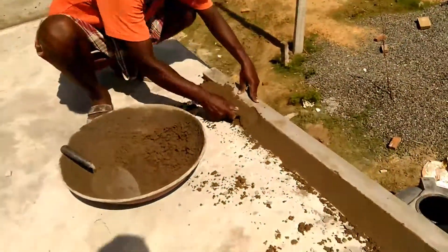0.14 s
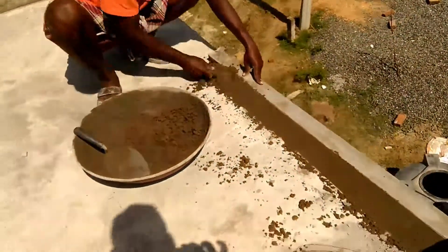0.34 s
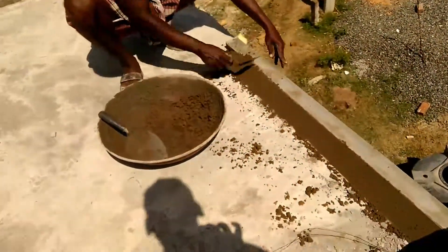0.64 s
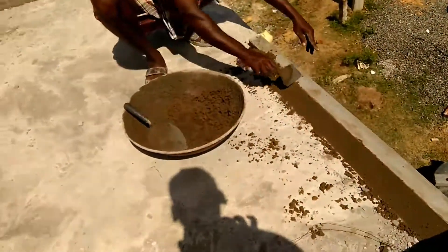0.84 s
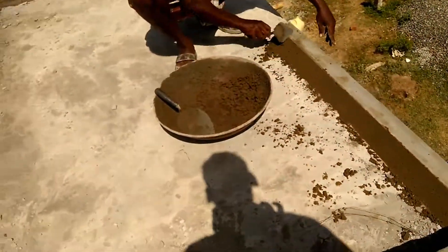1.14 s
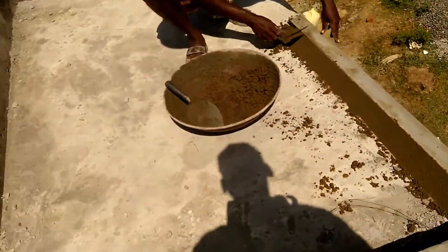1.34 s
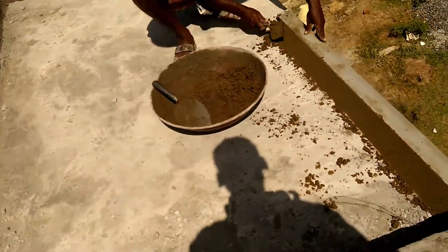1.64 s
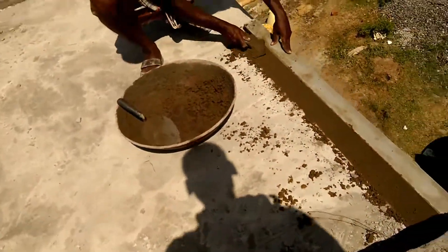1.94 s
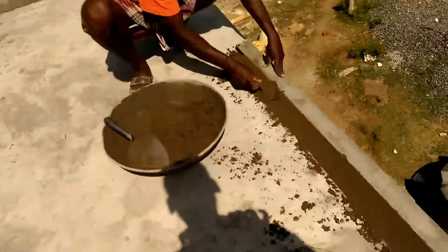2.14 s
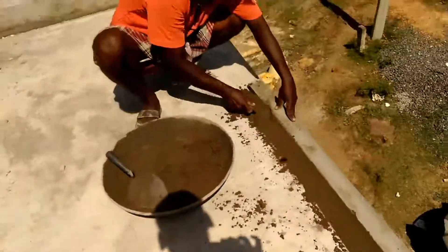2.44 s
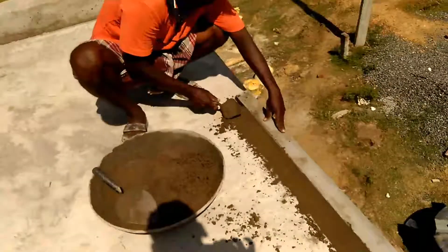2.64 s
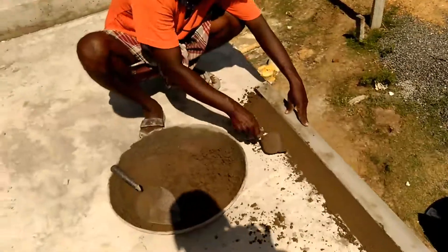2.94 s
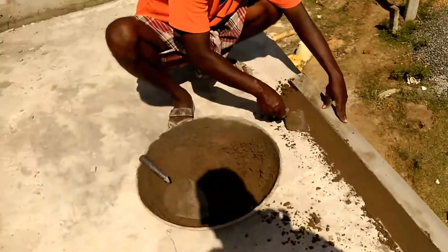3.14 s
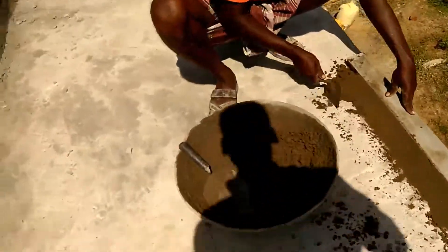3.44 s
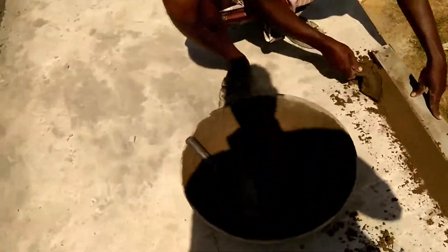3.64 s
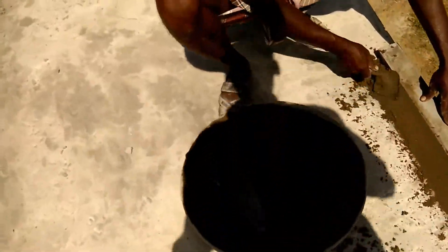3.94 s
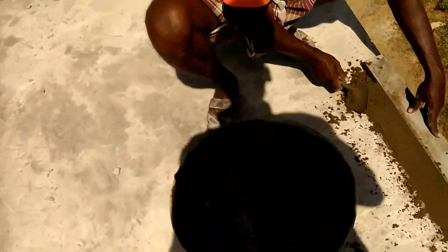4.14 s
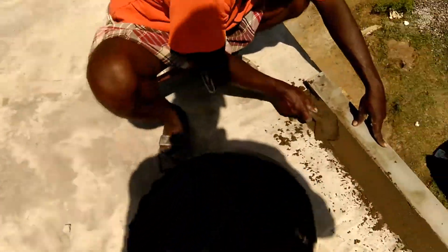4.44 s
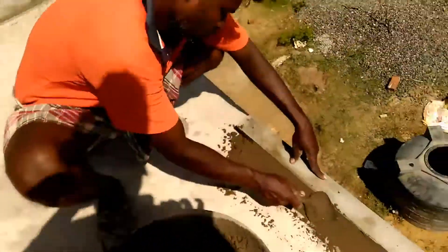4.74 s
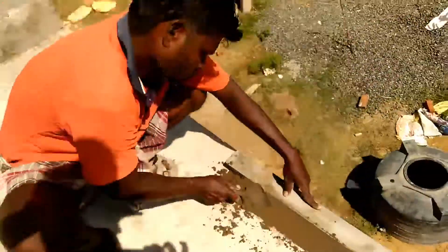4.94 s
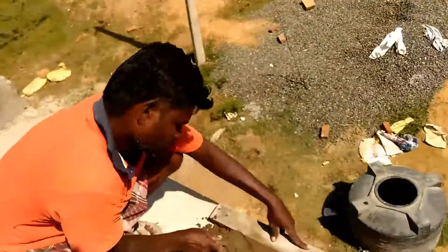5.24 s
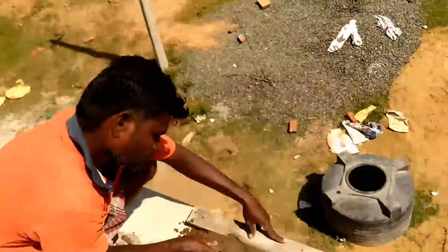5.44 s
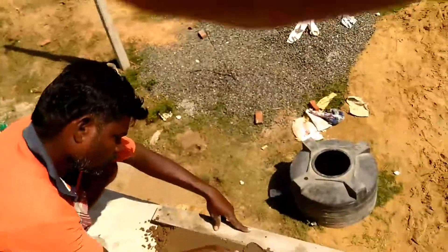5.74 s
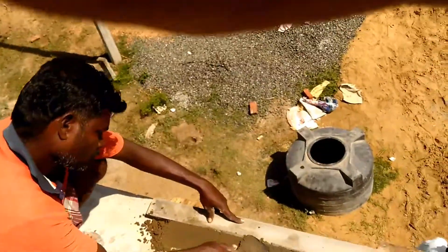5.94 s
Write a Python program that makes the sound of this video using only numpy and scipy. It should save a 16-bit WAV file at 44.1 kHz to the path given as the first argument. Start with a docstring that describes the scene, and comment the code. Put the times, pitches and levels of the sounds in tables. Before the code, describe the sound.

Wind thumps unevenly on the two sides of an open-air microphone, strong in the first second, thin through the middle, rising again after five seconds. Over it, a metal blade hisses across sandy mortar in uneven strokes, its edge grinding and snapping grit. Nine loud hammer-like knocks, hollow and woody, burst in with short dense echoes from hard walls, over a faint wash of air.

```python
"""A steel trowel smooths a strip of wet mortar on a concrete slab: sand hisses under the blade and grinds at
its edge. The hiss and grinding are showers of random grain ticks; the edge also catches and rasps, bright hiss
flares in short bursts, and coarse grains crack. Heavy knocks, like a hammer on boards somewhere else in the
building, add ringing tones and dense echoes from hard walls. Wind, as low noise and single slaps, buffets the
microphone's two ports, often one more than the other. A faint wash of air lies underneath, and the loudest
peaks are flattened by the overloaded microphone."""
import sys
import numpy as np
from scipy import signal
from scipy.fft import rfft, irfft, next_fast_len
from scipy.io import wavfile
from scipy.ndimage import uniform_filter1d

SR = 44100
rng = np.random.default_rng(int(sys.argv[2]) if len(sys.argv) > 2 else 0)


def inscribe(sig):
    """Save sig as 16-bit PCM at rate SR to the path in sys.argv[1].

    A 1-D sig is mono; a 2-D sig holds one channel per row.
    Samples are clipped to [-1, 1] before scaling.
    """
    pcm = np.round(np.clip(np.atleast_2d(sig).T, -1, 1) * 32767)
    wavfile.write(sys.argv[1], SR, pcm.astype(np.int16))


N = 269010
TIME = np.arange(N) / SR


def amp(db):
    """Turns decibels into a plain multiplier."""
    return 10 ** (np.asarray(db) / 20)


def evened(x):
    """Scales a sound to an rms of 1."""
    return x / np.sqrt(np.mean(x ** 2) + 1e-20)


def read(points, hz):
    """Reads a curve joined by straight lines over log frequency."""
    f, value = np.transpose(points)
    return np.interp(np.log(hz + 1), np.log(f + 1), value)


def curves(rows):
    """Reads each column of a timed table, sample by sample."""
    s, *columns = np.transpose(rows)
    return [np.interp(TIME, s, c) for c in columns]


def add(mix, start_s, sound):
    """Adds a short sound to the mix, cut off at the end of the scene."""
    part = mix[:, max(round(start_s * SR), 0):][:, :sound.shape[-1]]
    part += sound[..., :part.shape[1]]


def shaped(x, gain):
    """Filters a sound by a gain that is a function of Hz; rms 1."""
    size = next_fast_len(x.shape[-1] + 512)
    spectrum = rfft(x, size) * gain(np.fft.rfftfreq(size, 1 / SR))
    return evened(irfft(spectrum, size)[..., :x.shape[-1]])


def coloured(x, points):
    """Filters a sound by a table of frequency and level; rms 1."""
    return shaped(x, lambda f: amp(read(points, f)))


def wander(hz, shape=N):
    """Makes smooth random movement up to about the given rate; rms 1."""
    return shaped(rng.standard_normal(shape), lambda f: 1 / (1 + (f / hz) ** 4))


def ports(three, likeness, lag):
    """Mixes one shared sound, late at the left port by lag samples, with a separate part for each port."""
    shared = np.array([np.roll(three[0], lag), three[0]])
    return np.sqrt(likeness) * shared + np.sqrt(1 - likeness) * three[1:]


# still outdoor air, as a relative spectrum: pitch_hz, level_db (per Hz)
AIR_SPECTRUM = [(40, 9.5), (200, -14), (600, -18.5), (2000, -21), (5000, -26.5), (9000, -23),
                (13500, -25.5), (15000, -20), (16000, -38.5)]


def air():
    """A faint even wash of noise from the open yard."""
    return amp(-49.5) * coloured(rng.standard_normal((2, N)), AIR_SPECTRUM)


LEFTWARD_DB = 1.5  # the left port faces the wind and gets this much more
LUMPS_DB, LUMPS_HZ = 1.5, 8  # each port's share swells and sags by chance
PUFF_TAPER = 0.77  # share of a puff spent swelling and fading
# short puffs, most of them on one port: middle_s, length_s, strength_db (relative), left_minus_right_db
WIND_PUFFS = [(1.459, 0.055, -26, 1.5), (1.763, 0.31, -24, -23), (2.015, 0.09, -28, -23),
              (2.484, 0.24, -25.5, -26), (2.88, 0.23, -20.5, 27.5), (3.038, 0.11, -14.5, 43),
              (3.159, 0.1, -14.5, 5.5), (3.428, 0.072, -21, 28.5), (3.525, 0.087, -19.5, -12.5),
              (3.685, 0.17, -24, 6.5), (3.783, 0.054, -21, 3.5), (3.937, 0.092, -24.5, 5.5),
              (4.145, 0.091, -26, -34), (4.266, 0.15, -22, -15), (4.604, 0.31, -19.5, 34),
              (4.912, 0.051, -19.5, -17.5), (5.024, 0.21, -23.5, -29.5), (5.45, 0.11, -20.5, 4.5),
              (5.594, 0.12, -14, 27.5), (5.741, 0.13, -13.5, 16), (5.957, 0.1, -9, -8.5)]


def airflow(strength_db):
    """Strength of the wind at each port (relative dB): the power of a lumpy breeze plus that of the puffs."""
    facing_db = LEFTWARD_DB * np.array([[.5], [-.5]])
    power = amp(strength_db + facing_db + LUMPS_DB * wander(LUMPS_HZ, (2, N))) ** 2
    for middle_s, length_s, db, side_db in WIND_PUFFS:
        left = 1 / (1 + amp(-2 * side_db))  # share of the power
        puff = amp(db) * signal.windows.tukey(int(length_s * SR), PUFF_TAPER)
        add(power, middle_s - length_s / 2, 2 * np.array([[left], [1 - left]]) * puff ** 2)
    return 10 * np.log10(power)


# the wind blows, drops to a lull and returns: time_s, strength_db (relative),
# churn_octaves (how far the rumble's upper edge shifts)
WIND_STRENGTH = [(0, -12, -0.51), (.42, -14.5, 0.51), (.58, -12, 0.017), (.76, -13.5, .1),
                 (.85, -17, -0.33), (1.15, -15.5, -0.32), (1.35, -26, -0.042), (1.75, -28.5, 0.7),
                 (1.95, -35, 0.98), (2.28, -35.5, 1), (2.58, -31, 0.14), (2.78, -27.5, -2.1),
                 (3.25, -26, -0.21), (3.95, -28, 0.61), (4.08, -36.5, -0.15), (4.46, -47, -1.6),
                 (4.6, -25.5, 0.49), (5.27, -21, -0.088), (5.38, -16.5, 0.73), (5.5, -14, -0.18),
                 (5.66, -21.5, -1.2), (6.05, -12, -0.5)]
# what the ports pass of the turbulence: pitch_hz, level_db (per Hz, relative)
PORT_RESPONSE = [(50, 5.5), (100, 1), (200, -3.5), (400, -6.5), (1600, -6.5)]


def wind(edge_hz=180, octaves_per_db=0.2976, eddy_octaves=0.93, steep=2.7, steadying=0.68,
         low_cut_hz=47, pickup_db=2.5, highest_hz=800):
    """Each port has its own turbulence; stronger air and passing eddies push the rumble higher."""
    strength_db, churn = curves(WIND_STRENGTH)
    port_db = airflow(strength_db)
    eddies = np.tanh(wander(91, (2, N)))
    shift = octaves_per_db * (port_db + 16) + churn + eddy_octaves * eddies
    edge = edge_hz * 2 ** shift
    edge = edge / np.hypot(1, edge / highest_hz)  # the rising edge levels off at highest_hz
    noise = rng.standard_normal((2, N))
    rumble = np.zeros((2, N))
    # octave bands, each turned down when the moving edge falls below it
    for k in range(8):
        hz = 50 * 2 ** k
        octave = shaped(noise, lambda f: np.cos(np.pi / 2 * np.clip(np.log2((f + 1) / hz), -1, 1)) ** 2)
        level = np.sqrt(hz) * amp(read(PORT_RESPONSE, hz))
        rumble += octave * level / np.sqrt(1 + (hz / edge) ** (2 * steep))
    rumble = shaped(rumble, lambda f: 1 / (1 + (low_cut_hz / (f + 1)) ** 6))
    # within one gust the pressure swings keep a fairly even size
    power = uniform_filter1d(uniform_filter1d(rumble ** 2, size=1300), size=900)
    swing = np.sqrt(abs(power) + 1e-12)
    return evened(rumble / swing ** steadying) * amp(port_db + pickup_db)


CRACKLE_PER_S = 35  # lesser eddies slap by chance
CRACKLE_SPREAD_DB = 3  # their level follows the wind, give or take this much
CHURN_DB = 12.5  # and rises by this much for each octave of churn, which counts only up to 0.3
# single eddies slap a port: time_s, level_db (of the push's peak), left_minus_right_db
EDDY_SLAPS = [(0.536, 3, 2), (0.567, 14, 25), (0.597, -0.5, -5), (0.649, 7, -6), (0.669, -12, 15),
              (0.69, -5, 8), (0.716, 6.5, 9), (0.735, 12, 18), (0.776, 7, 31), (0.826, 0, 20.5),
              (0.837, -7, 22), (1.454, -14, -20), (1.723, -11.5, -10), (3.014, -7.5, 43.5), (3.045, -9, 32),
              (3.503, -12, -28), (4.235, -16.5, -29), (4.638, 0, 39), (5.548, 1, 37), (6.006, 3.5, -5)]


def slaps(crack_hz=2300):
    """An eddy bursts on a port: a sharp push and a slower pull; the harder it hits, the more it cracks."""
    out, t = np.zeros((2, N)), np.arange(SR // 30) / SR
    lead_s, width_s = .003, .0009
    u = np.maximum(t - lead_s, 0) / width_s
    push_pull = u * (2 - u) * np.exp(-u)
    strength_db, churn = curves(WIND_STRENGTH)
    chance = rng.random(N)
    spread, side = rng.uniform(-1, 1, (2, N))
    crackle_db = strength_db + CHURN_DB * np.minimum(churn, .3) + CRACKLE_SPREAD_DB * spread
    struck = np.flatnonzero(chance < CRACKLE_PER_S / SR)
    lesser = [(i / SR, crackle_db[i], 20 * side[i]) for i in struck]
    for time_s, db, side_db in list(EDDY_SLAPS) + lesser:
        size = amp(db)
        top_hz = 300 + crack_hz * np.tanh(2 * size)
        push = shaped(push_pull, lambda f: 1 / (1 + (f / top_hz) ** 2) ** 2)
        facing = amp(np.minimum(side_db * np.array([[1], [-1]]), 0))  # only the far port is turned down
        add(out, time_s - lead_s, rng.choice([-1, 1]) * size * facing * push / push.max())
    return out


# hammer blows: time_s, force_db, boom_db (of the boards), crack_db (treble tilt of the clatter),
# thud_db (first thud); all levels relative
HAMMER_BLOWS = [(0.127, -5.5, -6.5, -13, 7), (.872, 3.5, -4.5, -8.5, -17), (1.496, 1, -4, -0.5, -12),
                (2.078, -2.5, 0, 1.5, -1.5), (3.084, -1, -5.5, 8, 0), (3.709, -3, -6.5, 0, 3),
                (4.297, -5, -4.5, 3, 2), (4.843, -6.5, -5, 7.5, 5), (5.831, 2, -15, -3, 2)]
# what the boards ring with: pitch_hz, level_db (relative), t60_s (time to fall by 60 dB)
BOARD_MODES = [(229.2, -0.5, 0.082), (253, -3, 0.084), (290.3, -2, 0.18), (312.8, 6, 0.23),
               (359.6, -3.5, 0.43), (429.5, -5.5, 0.2), (581, 4, 0.1), (572, 0, 0.43), (621, 0, 0.35),
               (693, -17.5, 0.067), (960, -10.5, 0.48), (1065, -18.5, 0.15), (1220, -18.5, 0.28),
               (1320, -14, .2), (1233, -3.5, .2), (1510, -6, .24), (1710, -14.5, .22), (1876, -13, 0.16),
               (2065, -2.5, 0.19), (2500, -16, 0.21)]
# the dense clatter between the walls, before the treble tilt: pitch_hz, level_db (per Hz, relative)
CLATTER_SPECTRUM = [(60, -19.5), (190, -0.5), (300, 2.5), (480, -3.5), (590, -4.5), (750, -1.5),
                    (950, -1.5), (1500, -7), (2350, -6), (2900, -18), (4500, -15.5), (6500, -22),
                    (9000, -30.5), (15500, -46.5)]
# how slowly that clatter dies away: pitch_hz, t60_s
WALL_DECAY = [(200, 0.24), (600, 0.2), (1500, 0.21), (4000, 0.2), (10000, 0.18)]


def knocks(ring_db=-10.0, clatter_db=-5, thud_db=-5, gather_s=0.0047, hold_s=0.024, first=0.13, thud_s=0.014):
    """Each blow thuds and cracks, then the boards' modes and the walls' reflections swell and die away."""
    out, t = np.zeros((2, N)), np.arange(SR // 2) / SR
    lag = 15  # samples
    hz, mode_db, t60 = np.transpose(BOARD_MODES)[:, :, None]
    dying = np.maximum(t - hold_s, 0)
    swell = 1 - 0.85 * np.exp(-t / gather_s)
    for time_s, force_db, boom_db, crack_db, first_db in HAMMER_BLOWS:
        # the hammer lands on another spot each time, which weighs the modes anew
        weight = amp(mode_db + 1.8 * rng.standard_normal(hz.shape) - 60 * dying / t60)
        detuned = hz * (1 + 0.0055 * rng.standard_normal(hz.shape))
        turns = detuned * t + rng.random(hz.shape)
        ring = np.array([(weight * np.sin(2 * np.pi * (turns - hz * late / SR))).sum(0) for late in (lag, 0)])
        # random clicks stand for the reflections, and each pitch dies at its own rate
        taps = rng.choice([-1., 1.], (3, len(t))) * (rng.random((3, len(t))) < 4000 / SR)
        echoes = shaped(ports(taps, 0.42, lag),
                        lambda f: amp(read(CLATTER_SPECTRUM, f) + crack_db * f / (f + 2500)))
        f, age, z = signal.stft(echoes, SR, nperseg=256)
        fade_db = -60 * np.maximum(age - hold_s, 0) / read(WALL_DECAY, f)[:, None]
        tail = signal.istft(z * amp(fade_db))[1][:, :len(t)]
        # the direct sound: a dull, heavily damped flex of the struck board
        flex = shaped(ports(rng.standard_normal((3, len(t))), 0.97, lag),
                      lambda f: 1 / (1 + (f / 1100) ** 7.5) / (1 + (220 / (f + 1)) ** 3))
        boom = amp(ring_db + boom_db) * ring * swell
        clatter = amp(clatter_db) * tail * (swell + first * np.exp(-t / 0.00051))
        thud = amp(thud_db + first_db) * flex * np.exp(-t / thud_s)
        add(out, time_s, amp(force_db) * (boom + clatter + thud))
    return out * amp([[.9], [-.9]])


# a breaking grain, as a relative spectrum: pitch_hz, level_db (per Hz)
GRAIN_SPECTRUM = [(400, -24.5), (1500, -10.5), (3000, 5), (8000, 5), (16000, -22)]
# coarse grains crack under the steel: time_s, level_db (before the fade)
GRAIN_CRACKS = [(0.102, -13.5), (0.1307, -14), (0.952, -21), (1.869, -37), (2.3337, -21), (2.5362, -17.5),
                (3.5703, -25), (3.911, -24.5), (4.515, -25), (4.5423, -22), (4.594, -26), (4.6562, -19),
                (4.755, -12), (5.7139, -22), (5.746, -18), (5.7964, -20)]


def cracks(decay_s=0.0026):
    """A coarse grain crumbles in a few milliseconds: a quickly fading burst of noise."""
    out, t = np.zeros((2, N)), np.arange(SR // 20) / SR
    for time_s, db in GRAIN_CRACKS:
        crumble = coloured(rng.standard_normal((2, len(t))), GRAIN_SPECTRUM)
        add(out, time_s, amp(db) * crumble * np.exp(-t / decay_s))
    return out


def sand(per_s, spread_db, smooth):
    """Countless grain ticks of uneven size over a smooth rush, at both ports."""
    grains = rng.standard_normal((3, N))
    size = amp(spread_db * np.minimum(rng.exponential(1, (3, N)), 4))
    ticks = grains * size * (rng.random((3, N)) < per_s / SR)
    return ports(evened(ticks) + smooth * rng.standard_normal((3, N)), 0.28, lag=5)


# the blade catches hard and rasps; the two broad rows near 12 kHz are short bursts of bright hiss: # middle_s,
# level_db (before the fades), pitch_hz, width_hz (to either side of the pitch), length_s
CATCHES_AND_BURSTS = [(1.046, -27, 1460, 200, 0.07), (1.112, -22, 1570, 220, 0.045),
                      (1.152, -23.5, 1480, 121, 0.034), (1.869, -26, 1760, 200, 0.055),
                      (1.87, -22.5, 2480, 200, 0.026), (1.863, -39.5, 12000, 3500, 0.13),
                      (2.223, -20, 1300, 200, 0.072), (2.297, -21, 1580, 450, 0.036),
                      (2.838, -51.5, 4420, 400, 0.029), (3.25, -24.5, 1590, 354, 0.06),
                      (3.27, -26.5, 2550, 121, .05), (3.936, -34, 1710, 245, 0.089),
                      (3.977, -28.5, 4040, 400, 0.072), (4.001, -26.5, 2760, 356, 0.073),
                      (4.517, -27, 3000, 600, 0.054), (4.619, -29, 2680, 220, 0.16), (4.68, -28, 4060, 900, 0.4),
                      (4.769, -20, 2260, 590, 0.049), (4.805, -29, 1710, 300, 0.024),
                      (4.793, -35, 3740, 900, 0.073), (5.863, -32.5, 11600, 3520, 0.13)]


def catches_and_bursts():
    """Slips of the edge excite one resonance of the blade: grain ticks filtered around a single pitch; the
    broad rows near 12 kHz give short bursts of bright hiss instead."""
    out, slips = np.zeros((2, N)), sand(900, 2.2, 0.2)
    for middle_s, db, hz, width_hz, length_s in CATCHES_AND_BURSTS:
        start_s, size = max(middle_s - length_s / 2, 0), int(length_s * SR)
        piece = slips[:, int(start_s * SR):][:, :size]
        rasp = shaped(piece, lambda f: 1 / (1 + ((f - hz) / width_hz) ** 2))
        add(out, start_s, amp(db) * rasp * signal.windows.tukey(rasp.shape[1], .7))
    return out


REST_DB = -67.5  # the blade stirs on the mortar between strokes
# the flat of the blade sweeps the mortar: start_s, end_s, hiss_db, speeding_up_s, slowing_down_s
BLADE_SWEEPS = [(.003, 0.023, -28.5, 0.0043, 0.012), (0.049, 0.607, -28, 0.059, 0.23),
                (0.938, 1.32, -29, 0.21, 0.25), (1.781, 1.915, -32.5, 0.15, 0.11),
                (1.818, 2.357, -26.5, 0.45, 0.053), (2.353, 2.735, -27.5, 0.036, 0.2),
                (3.138, 3.306, -38, 0.034, .04), (3.907, 4.13, -32.5, 0.084, 0.16),
                (4.323, 4.834, -29, 0.53, 0.064), (4.842, 5.2, -25, 0.078, 0.22),
                (5.275, 5.454, -40, 0.077, 0.039), (5.379, 5.828, -31, 0.2, 0.018),
                (5.784, 6.01, -26.5, .02, 0.13), (5.969, 6.15, -27.5, 0.11, 0.044)]


def sweeping():
    """Level of the hiss (dB): it follows the speed of the blade, which eases in and out of each sweep."""
    power = amp(REST_DB) ** 2
    for start_s, end_s, db, rise_s, fall_s in BLADE_SWEEPS:
        speed = np.clip(np.minimum((TIME - start_s) / rise_s, (end_s - TIME) / fall_s), 0, 1)
        power = power + (amp(db) * np.sin(np.pi / 2 * speed) ** 1.87) ** 2
    return 10 * np.log10(power)


DRAG_DB = -12  # the edge trails along in every sweep, at this level against the hiss
BITE_S, LIFT_S = 0.0017, 0.018  # the edge takes hold, and dies away once lifted
# the edge digs in, bears down or eases off, and lifts: start_s, end_s, first_db, last_db (grinding)
EDGE_SCRAPES = [(.007, .014, -22, -28), (0.1, .16, -32, -21.5), (0.955, 1.157, -31, -25),
                (1.167, 1.288, -29.5, -36.5), (1.62, 1.83, -40.5, -57), (1.812, 1.873, -45, -26),
                (2.202, 2.334, -33, -26), (2.383, 2.44, -43, -21.5), (3.178, 3.275, -23.5, -24),
                (3.3, 3.616, -52, -38), (3.568, 3.569, -11, -24.5), (3.91, 4.002, -35, -30),
                (4.41, 4.746, -43, -31), (4.752, 4.837, -18, -27), (5.712, 5.832, -33, -27.5),
                (6.004, 6.07, -31, -31)]


def scraping():
    """Level of the grinding (dB): a quick bite, a steady change of pressure, a quick release."""
    power = amp(sweeping() + DRAG_DB) ** 2
    for start_s, end_s, first_db, last_db in EDGE_SCRAPES:
        bite = np.clip((TIME - start_s) / BITE_S, 0, 1)
        release = np.exp(-np.clip((TIME - end_s) / LIFT_S, 0, 20))
        pressure = amp(np.interp(TIME, [start_s, end_s], [first_db, last_db]))
        power = power + (bite * release * pressure) ** 2
    return 10 * np.log10(power)


def shifting(x, patchy_db, frames_size, bins_size):
    """The contact point moves along the blade, so its resonances come and go: random patches of level."""
    z = signal.stft(x, nperseg=512)[2]
    over_pitch = uniform_filter1d(rng.standard_normal(z.shape[1:]), bins_size, 0)
    patches = evened(uniform_filter1d(over_pitch, frames_size, 1))
    return evened(signal.istft(z * amp(patchy_db * patches))[1][:, :N])


# sand under the flat blade, as a relative spectrum: pitch_hz, level_db (per Hz)
HISS_SPECTRUM = [(400, -25), (1500, -7.5), (4300, -6), (5800, 3), (7700, 3), (9500, -8.5), (12000, -13),
                 (15500, -15)]
# sand under the blade's edge, as a relative spectrum: pitch_hz, level_db (per Hz)
GRIND_SPECTRUM = [(300, -6.5), (700, -6), (1400, 2.5), (2500, 3), (4200, -3), (6000, -7), (10000, -15),
                  (16000, -24)]


def trowel(hiss_db, grind_db, grit_db=-6):
    """Fine sand hisses evenly under the flat of the blade; the edge grinds with a judder and snaps coarser grit."""
    judder = wander(90)
    hiss = coloured(sand(6000, 3.3, 1.0), HISS_SPECTRUM)
    hiss = shifting(hiss, 1.5, frames_size=6, bins_size=3)
    grind = coloured(sand(1500, 2.0, 0.83), GRIND_SPECTRUM)
    grind = shifting(grind, 4.2, frames_size=7, bins_size=3)
    # about 160 snaps a second, each a short crumble
    snaps = rng.standard_normal(N) * (rng.random(N) < 160 / SR)
    t = np.arange(SR // 100) / SR
    crumble = coloured(rng.standard_normal((2, len(t))), GRAIN_SPECTRUM) * np.exp(-t / 0.0013)
    grit = evened(signal.oaconvolve(snaps[None], crumble, axes=1)[:, :N])
    balance = amp([[1.2], [-1.2]])  # a little louder on the left
    flat = hiss * amp(hiss_db + 1.1 * judder) * balance
    edge = grind * amp(grind_db + 2.1 * judder) * balance
    # the grit follows the midpoint between hiss and grinding
    return flat + edge + grit * amp(grit_db + (hiss_db + grind_db) / 2)


def scene():
    """Adds up the trowel work, the knocks and the background."""
    work = trowel(sweeping(), scraping()) + catches_and_bursts() + cracks()
    return work + knocks() + wind() + slaps() + air()


def record(dry):
    """The loudest peaks flatten at full scale; then a filter takes away the highest treble."""
    clipped = dry / (1 + abs(dry) ** 8) ** (1 / 8)
    top_hz = 15850
    low_pass = signal.firwin(511, top_hz, window=("kaiser", 8), fs=SR)
    return signal.oaconvolve(clipped, low_pass[None], "same")


dry = scene()
out = record(dry)
inscribe(out)
```